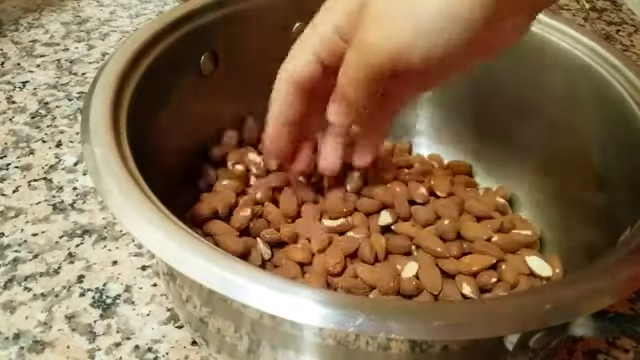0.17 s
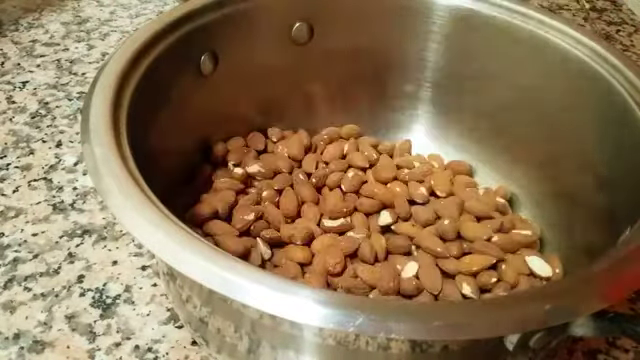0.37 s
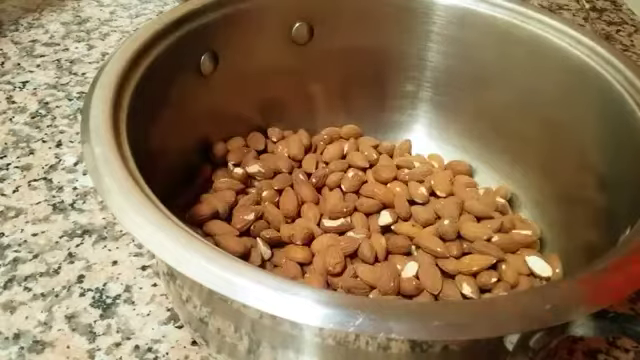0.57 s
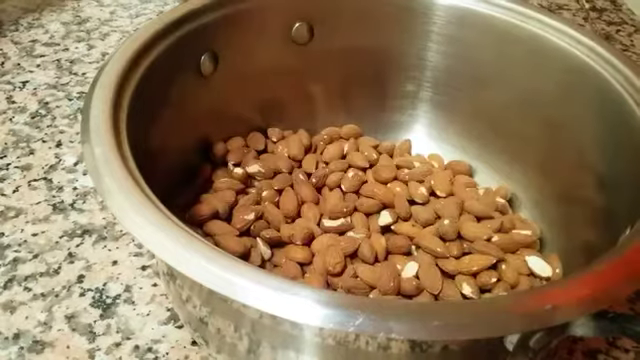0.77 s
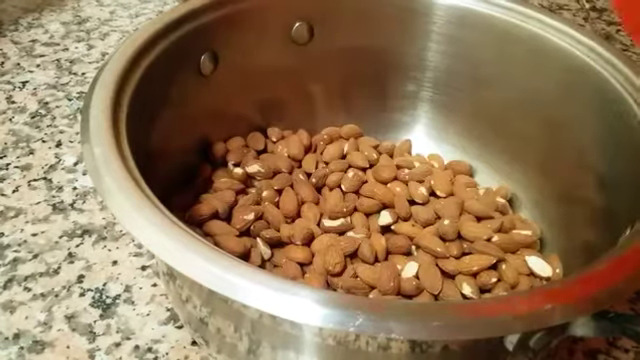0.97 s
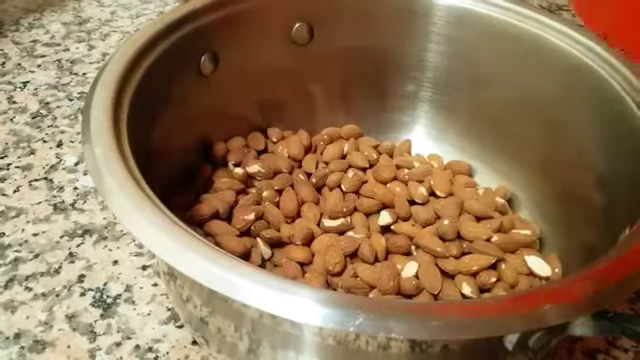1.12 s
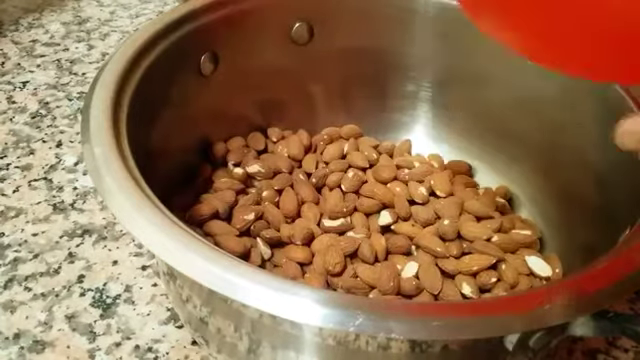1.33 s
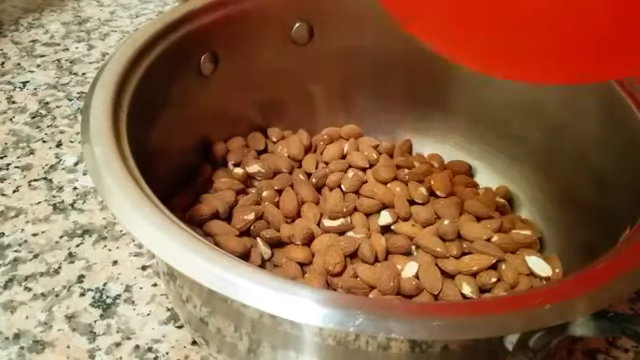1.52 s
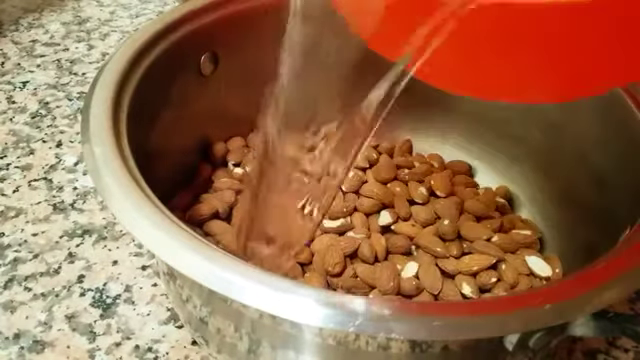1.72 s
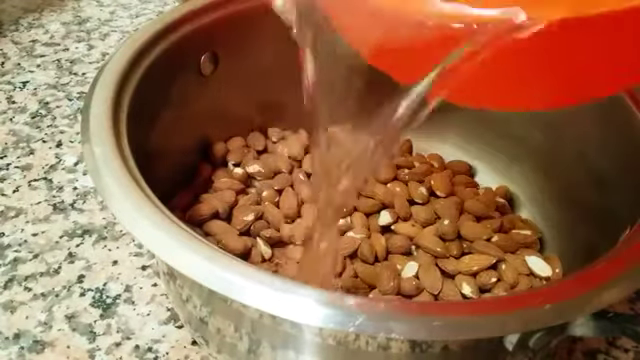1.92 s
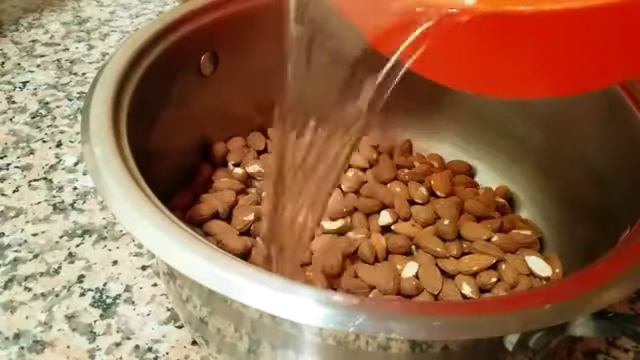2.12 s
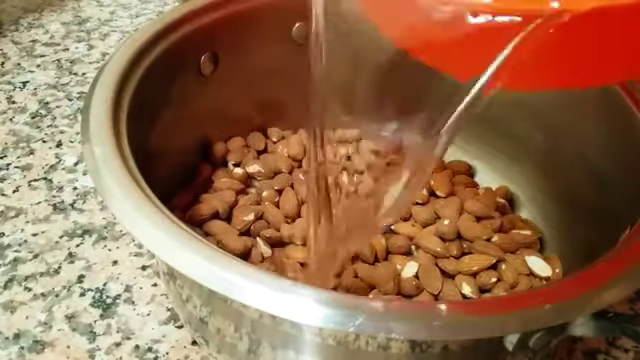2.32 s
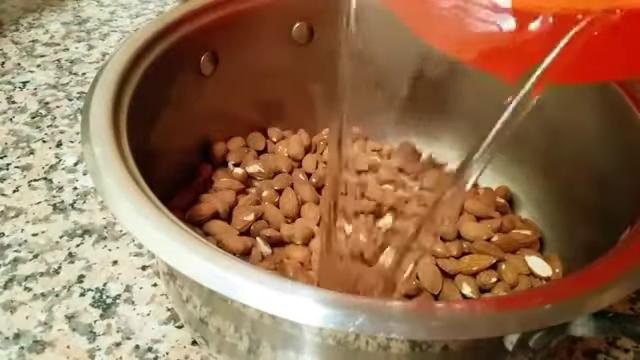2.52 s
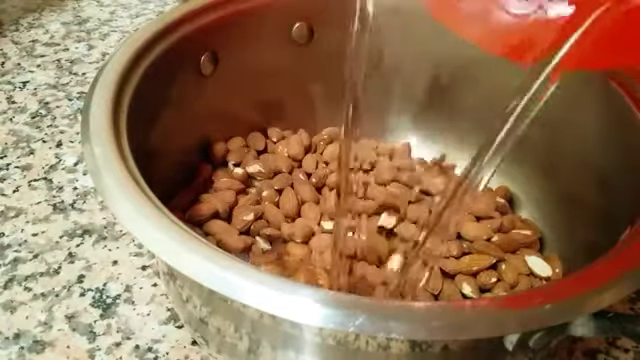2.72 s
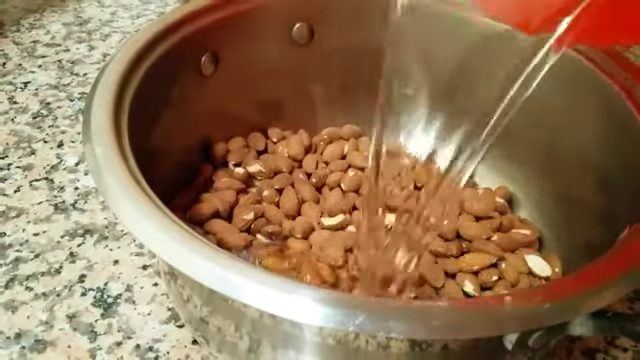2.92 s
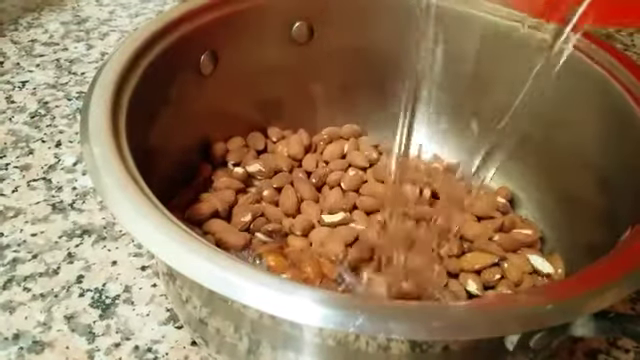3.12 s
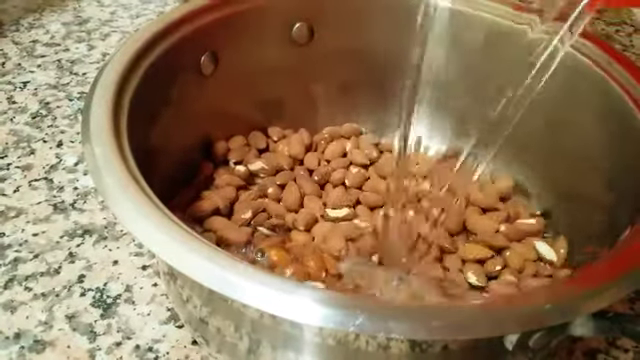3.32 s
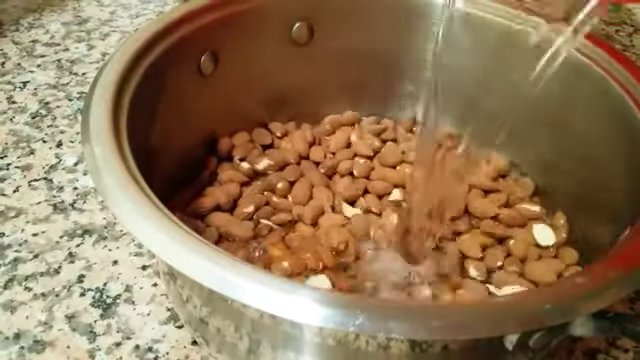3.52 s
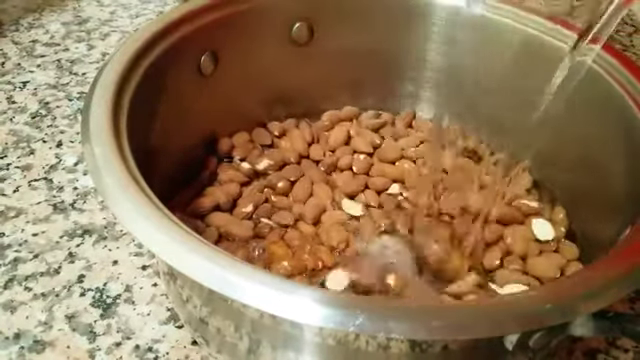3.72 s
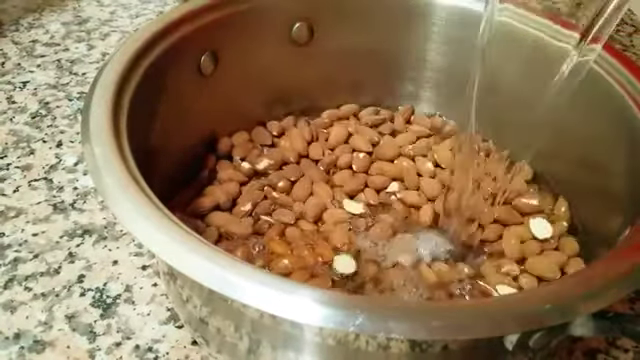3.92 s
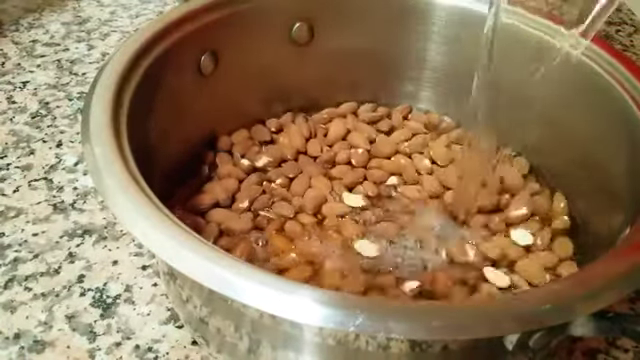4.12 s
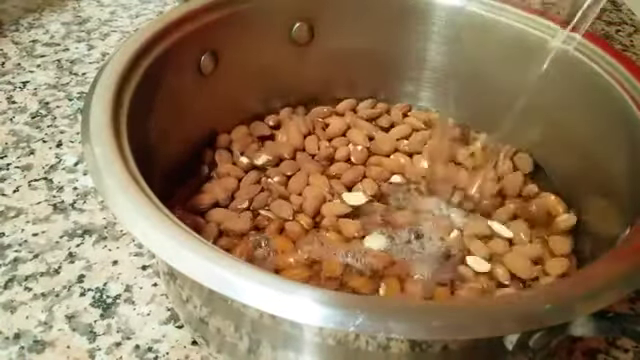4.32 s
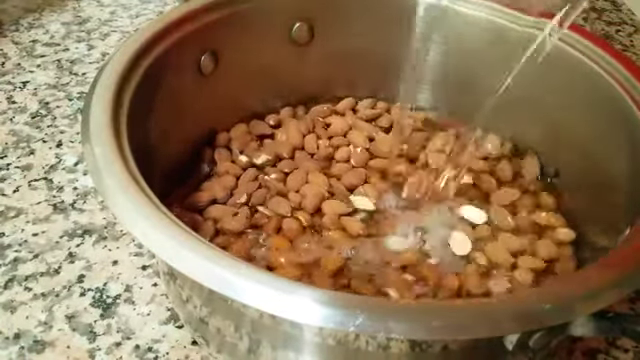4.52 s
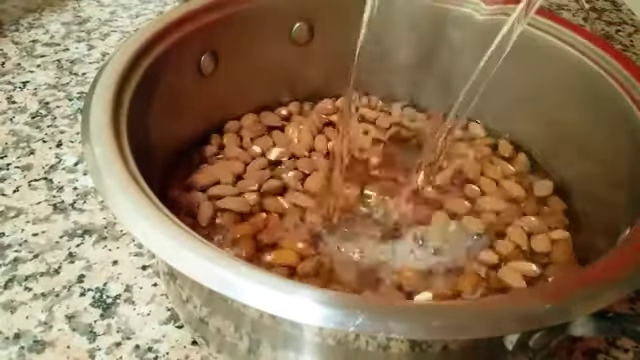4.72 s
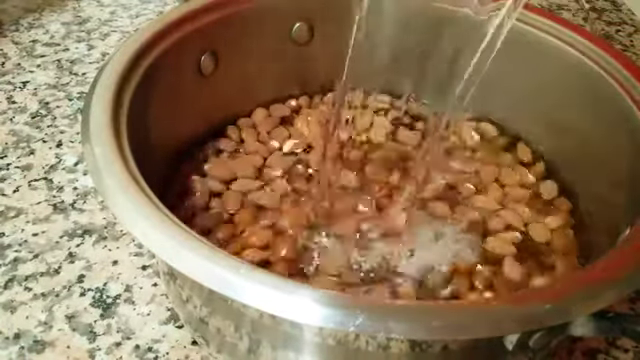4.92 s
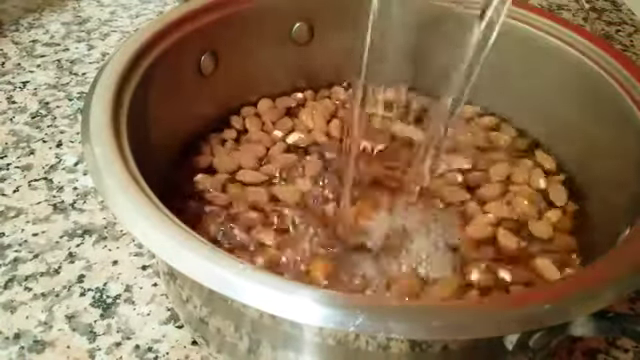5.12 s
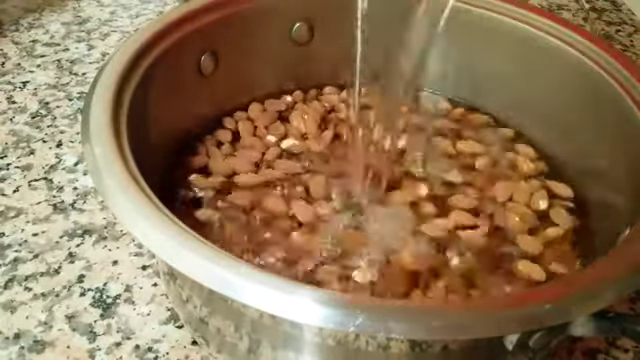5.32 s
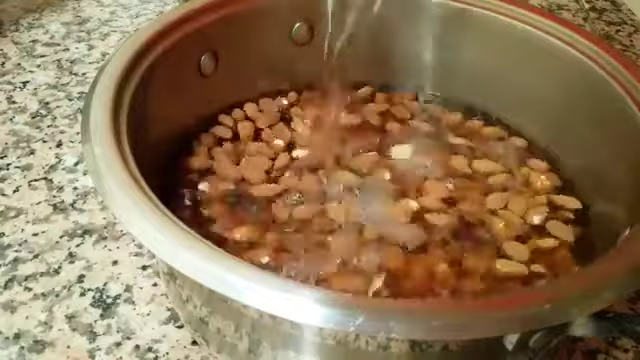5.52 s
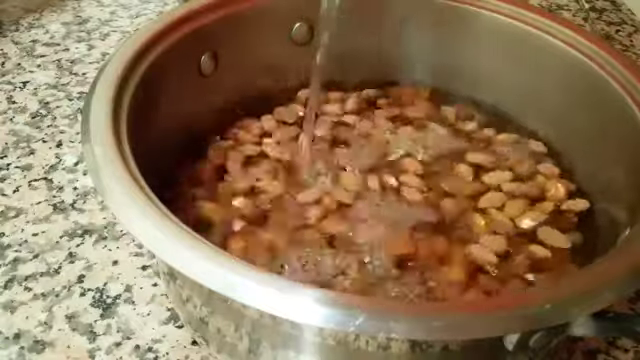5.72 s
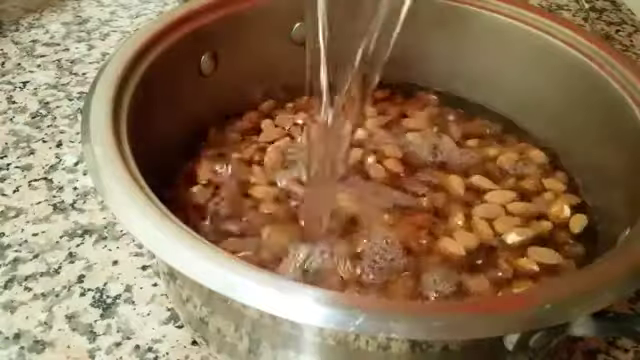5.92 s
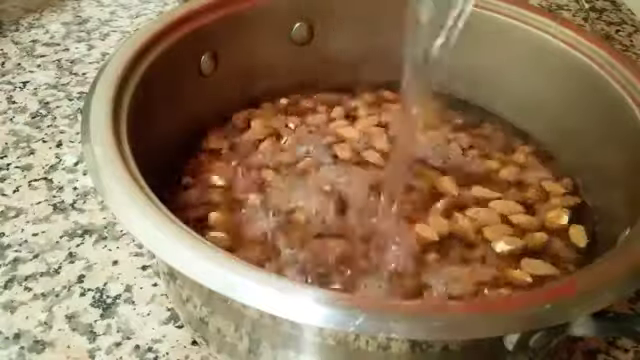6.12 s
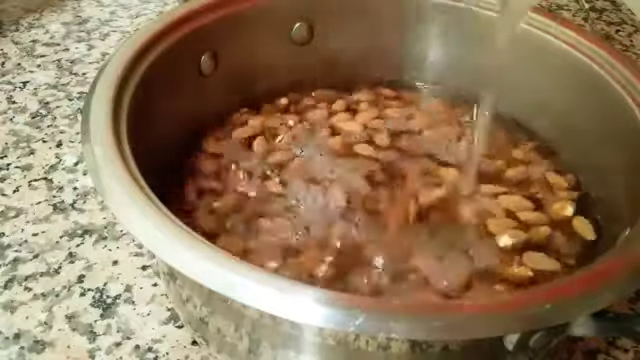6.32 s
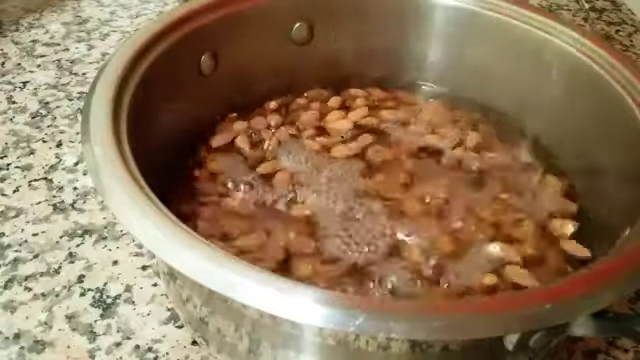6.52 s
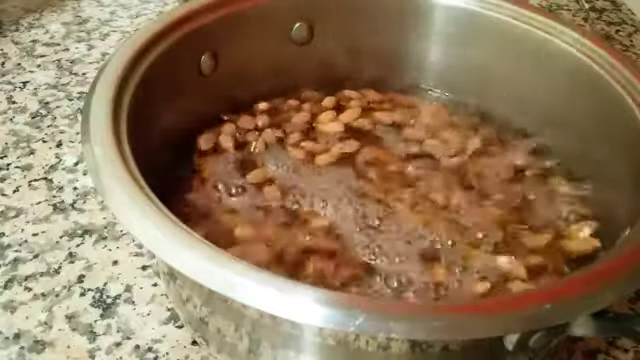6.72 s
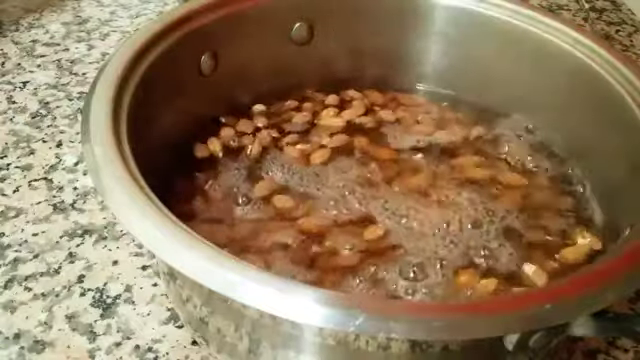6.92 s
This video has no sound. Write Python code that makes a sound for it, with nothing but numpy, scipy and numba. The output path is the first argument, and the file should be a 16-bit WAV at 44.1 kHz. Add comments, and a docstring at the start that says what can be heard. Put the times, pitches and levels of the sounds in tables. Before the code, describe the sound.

Dry almonds rattle briefly in a steel pot, then after a quiet pause water pours in, pattering, drumming and bubbling until it ends in fizz.

```python
"""Over a low kitchen hum, a hand stirs dry almonds in a steel pot: noise grains rub and knocks ring the pot.
Soft rustles, a thin whine and a tap come before water is poured from a jug.
The water patters on the nuts, drums and bubbles as it pools; its bubbles are fading sines that rise in pitch.
Loud drops and heavy slugs stand out, and foam fizzes on the pool.
Late in the pour the sound cuts out for a moment; then the pour ends in drips, fizz and hum."""
import sys
import numpy as np
from scipy import signal
from scipy.fft import rfft, irfft
from scipy.io import wavfile
from scipy.ndimage import uniform_filter1d
from numba import njit

SR = 44100
rng = np.random.default_rng(int(sys.argv[2]) if len(sys.argv) > 2 else 0)


def dump(signal):
    """Clip the signal to [-1, 1] and save it as 16-bit WAV at the path in sys.argv[1]."""
    limited = np.clip(np.atleast_2d(signal).T, -1, 1)
    pcm = np.round(limited * 32767).astype(np.int16)
    wavfile.write(sys.argv[1], SR, pcm)


N = 307104  # length in samples
T = np.arange(N) / SR  # time in seconds
TOP_HZ = 15200  # highest pitch let through
POUR_START_S, POUR_END_S = 1.685, 6.604
POOL_START_S = 2.11  # water starts to gather between the nuts

# how strongly the fingers stir, until they lift out and the nuts settle: t/s, relative level/dB
STIR = [(0, -39.5), (.06, -44.5), (.14, -38), (.21, -40.5), (.25, -52), (.32, -57), (.39, -60), (.46, -79)]
# strength of the stream as the jug tips: t/s, flow/dB
FLOW = [(1.7, 2.5), (1.8, 1), (1.98, -8), (2.04, -1.5), (2.25, -3), (2.4, -11), (2.5, -6.5), (2.63, -2.5),
        (2.69, -9), (2.73, -2), (2.85, 2.5), (3.16, 5), (3.4, 3), (3.6, -1.5), (3.67, -3), (3.8, -1),
        (4.3, .5), (4.7, 5.5), (5.1, 5), (5.45, -2), (5.6, 0.5), (6.12, -1), (6.35, 3), (6.6, -2)]
# shape of the stream: t/s, smoothness (about -1 = broken into drops, 1 = an unbroken column)
SMOOTHNESS = [(2.6, -.1), (3.8, 0), (4.65, -.1), (4.97, .4), (5.2, 1.05), (5.45, 1.15), (5.6, .7),
              (5.77, -.5), (6.6, -.9)]
# single drops and their bubbles: t/s, bubble level/dB, f/Hz,
# relative treble splash level/dB, relative mid spatter level/dB
PLOPS = [(1.689, -27, 1730, -44, -46), (1.718, -19.5, 1640, -35, -21.5), (1.735, -36, 1660, -46, -24),
         (1.862, -32.5, 5530, -41, -42), (1.898, -34, 4530, -33.5, -51), (1.953, -37, 6270, -50, -58),
         (2.024, -38, 1114, -34, -41), (2.063, -37, 1084, -52, -33), (2.092, -33, 3300, -48, -44),
         (2.122, -33.5, 1140, -55, -34), (2.163, -34, 6500, -34.5, -49), (2.21, -38, 1620, -36, -37),
         (2.264, -30, 6130, -38, -49), (2.313, -30, 8550, -45, -49), (2.353, -40.5, 1110, -45, -40),
         (2.514, -32.5, 5510, -41, -47), (2.542, -35.5, 1078, -53, -42), (2.649, -33, 1074, -35, -34),
         (2.711, -28.5, 1085, -40, -33), (2.77, -24, 1670, -52, -26), (2.785, -34, 1670, -34, -29.5),
         (2.879, -24.5, 1060, -31, -24), (2.902, -23, 1510, -52, -18.5), (2.933, -24, 1090, -36.5, -19.5),
         (3.006, -29.5, 5860, -60, -46), (3.051, -26, 1120, -33, -27), (3.074, -25, 1130, -50, -24),
         (3.094, -30, 1180, -40, -27), (3.125, -20.5, 1110, -46, -17.5), (3.16, -28, 1000, -46, -27),
         (3.198, -20.5, 5440, -32.5, -51.5), (3.213, -32, 2740, -52, -15), (3.239, -24, 1137, -53, -23),
         (3.288, -21, 3290, -57, -18.5), (3.308, -19.5, 1116, -48, -31), (3.341, -22, 1086, -50, -16.5),
         (3.379, -34, 1070, -48, -41), (3.446, -24, 1960, -36, -15), (3.532, -31, 1770, -33.5, -20.5),
         (3.629, -34, 655, -42, -25), (3.713, -25, 2460, -35, -41), (3.753, -20, 2560, -39, -30),
         (3.778, -24, 3200, -38, -20), (3.801, -20.5, 1480, -38, -18), (3.84, -21.5, 1100, -41, -25),
         (3.882, -26.5, 4570, -47, -18), (4.04, -25, 1620, -55, -19.5), (4.072, -27.5, 512, -43, -27),
         (4.116, -22.5, 3500, -37, -13.5), (4.259, -29, 872, -41, -24), (4.331, -26, 814, -40, -20.5),
         (4.387, -28, 1930, -43, -27), (4.439, -20, 2880, -28, -15), (4.503, -35, 1700, -30.5, -16),
         (4.55, -29, 900, -33.5, -19), (4.573, -26, 1080, -52, -22.5), (4.613, -20.5, 1200, -38, -19),
         (4.647, -16.5, 865, -31.5, -15), (4.685, -22, 1990, -23.5, -12), (4.746, -18, 2200, -50, -20),
         (4.772, -20, 2710, -41, -25), (4.814, -24, 1110, -45, -29), (4.856, -24, 1100, -54, -20),
         (4.922, -23, 1110, -56, -18), (4.974, -34, 8500, -49, -40), (4.992, -28, 830, -56, -20),
         (5.093, -22, 3200, -53, -39), (5.119, -21, 1710, -40, -26), (5.353, -25, 2210, -53, -39),
         (5.483, -45, 11600, -49, -40), (5.494, -35.5, 8700, -50, -43.5), (5.503, -30, 1160, -33, -15.5),
         (5.571, -24, 1105, -35, -19), (5.588, -25, 1950, -34, -34), (5.76, -25.5, 1680, -34.5, -16.5),
         (5.804, -28, 1470, -39, -31), (5.819, -25, 1700, -47, -27), (5.838, -34, 1180, -32, -32),
         (5.855, -29, 1160, -29, -43), (5.905, -24, 4290, -33, -21.5), (5.958, -20, 4100, -33, -18),
         (5.985, -18, 3930, -34, -22), (6, -25, 2540, -39, -15.5), (6.109, -28.5, 800, -62, -26),
         (6.124, -36, 840, -40, -34), (6.209, -40, 1055, -37, -49), (6.289, -25, 2960, -26, -21),
         (6.309, -22, 3580, -43, -15.5), (6.321, -26, 1140, -49, -27), (6.332, -24, 1295, -42, -28),
         (6.372, -26, 1600, -31.5, -13.5), (6.421, -23.5, 794, -38.5, -37),
         (6.426, -16.5, 3440, -36, -22.5), (6.461, -23, 1710, -49, -22), (6.481, -22.5, 4520, -27, -36),
         (6.535, -27, 2410, -47, -28), (6.548, -43, 5700, -33, -34), (6.577, -31, 1680, -33, -37),
         (6.605, -26.5, 1680, -32.5, -21), (6.642, -26.5, 3610, -34, -24)]
# heavy slugs of water that punch into the pool: t/s, peak level/dB, lowest f/Hz, highest f/Hz, 60 dB decay/s
SLUGS = [(3.813, -30, 460, 770, 0.03), (4.161, -26.5, 414, 1290, 0.027), (4.205, -28, 445, 1290, 0.022),
         (4.6455, -18, 770, 1500, 0.02), (4.647, -18.5, 2650, 4400, 0.019), (4.688, -20.5, 3010, 4160, .02),
         (4.751, -24.5, 1900, 2620, .04), (4.973, -31.5, 398, 810, 0.038), (6.372, -28, 1090, 2460, 0.0091)]


def undb(db):
    """Turn decibels into a gain."""
    return 10 ** (np.asarray(db) / 20)


def unit(x):
    """Scale a signal to an rms (average strength) of 1."""
    return x / np.sqrt(np.mean(x ** 2))


def control(table, column=1):
    """Join the points of a table into a smooth-running control curve over time."""
    rows = np.array(table)
    return np.interp(T, rows[:, 0], rows[:, column])


def curve(table, column):
    """Gain over time from one dB column, practically silent outside its span."""
    rows = np.array(table)
    return undb(np.interp(T, rows[:, 0], rows[:, column], left=-140, right=-140))


def swells(table):
    """Bell-shaped rises; rows hold middle and half-length in s, then dB columns that give one curve each."""
    rows = np.array(table)
    bells = np.exp(-((T - rows[:, :1]) / rows[:, 1:2]) ** 2)
    return rows[:, 2:].T @ bells


def ramp(start, length):
    """Rise steadily from 0 to 1."""
    return np.clip((T - start) / length, 0, 1)


def fade(t, t60):
    """Die away smoothly, by 60 dB in t60 seconds."""
    return np.exp(-np.log(1000) * t / t60)


def add(out, s, x):
    """Mix a short sound in at time s."""
    i = max(int(s * SR), 0)
    out[i:i + len(x)] += x[:max(N - i, 0)]


def convolve(x, response):
    """Let every sample of a sound set off the same response."""
    return signal.fftconvolve(x, response)[:N]


def band(x, lo_hz, hi_hz):
    """Keep only the pitches between two limits."""
    limits = [lo_hz, min(hi_hz, SR / 2 - 100)]
    return signal.sosfilt(signal.butter(2, limits, "band", fs=SR, output="sos"), x)


def colour(x, points, size=4096):
    """Shape the tone to a (Hz, dB) outline with a filter that never sounds before its input."""
    hz, db = np.transpose(points)
    bins_hz = np.arange(size // 2 + 1) * SR / size
    outline_db = np.interp(np.log(bins_hz + 1), np.log(hz), db)
    # folding the cepstrum (spectrum of the log spectrum) packs the response towards its start
    cepstrum = irfft(np.log(undb(outline_db)))
    cepstrum[1:size // 2] *= 2
    cepstrum[size // 2 + 1:] = 0
    return convolve(x, irfft(np.exp(rfft(cepstrum))))


def even(x, span):
    """Hold the mean power near 1 over about span seconds, keeping the fine grain."""
    size = int(span * SR)
    power = uniform_filter1d(uniform_filter1d(x ** 2, size), size)
    return x / np.sqrt(power + 1e-12)


def sizes(chance, spread_db):
    """Many small grains and a few big ones; a negative spread gives many big and a few small."""
    return undb(-spread_db * np.log(np.maximum(chance, .008)))


def clicks(rate, spread_db):
    """One-sample impacts at random moments, rate of them per second on average."""
    when, size, sign = rng.random((3, N))
    return (when < rate / SR) * sizes(size, spread_db) * np.sign(sign - .5)


def moments(chance):
    """Random times that crowd together where the stream is smooth."""
    rate_octaves = .8  # doublings of the bubble rate per unit of smoothness
    weight = np.cumsum(2 ** (rate_octaves * control(SMOOTHNESS)))
    return np.interp(chance, weight / weight[-1], T)


@njit
def ring(starts, hz, cycles, size, rise):
    """Each bubble is a damped sine whose pitch rises as it nears the surface."""
    out = np.zeros(N)
    for k in range(len(starts)):
        first = int(starts[k] * SR)
        length = cycles[k] * SR / hz[k]
        phase = 0.
        for i in range(min(int(length), N - first)):
            phase += 2 * np.pi * hz[k] / SR * (1 + rise * i / length)
            out[first + i] += size[k] * np.exp(-6.9 * i / length) * np.sin(phase)
    return out


def cloud(when, hz, size, cycles, rise):
    """Bubbles of random damping; each returns from the pot wall with a delay set by its place."""
    damping, place, sign = rng.random((len(when), 3)).T
    length = cycles * 2 ** (2 * damping - 1)
    size = size * np.sign(sign - .5)
    direct = ring(when, hz, length, size, float(rise))
    wall_delay = .0004 + .0024 * place
    return direct + 0.73 * ring(when + wall_delay, hz, length, size, float(rise))


def bubbles(lo_hz, hi_hz, cycles, spread_db, rise, count):
    """Bubbles of every pitch in a range, with equal power per Hz."""
    when, radius, size = rng.random((count, 3)).T
    hz = lo_hz + (min(hi_hz, TOP_HZ) - lo_hz) * radius
    # higher bubbles are shorter, so they start louder
    return cloud(moments(when), hz, sizes(size, spread_db) * np.sqrt(hz), cycles, rise)


def pockets(centre_hz, octaves, cycles, spread_db, rise, count):
    """Air pockets whose pitches scatter round a centre that may move."""
    when, size = rng.random((count, 2)).T
    when = moments(when)
    centre = np.interp(when, T, np.broadcast_to(centre_hz, N))
    scatter = np.interp(when, T, np.broadcast_to(octaves, N))
    hz = centre * 2 ** (scatter * rng.standard_normal(count))
    return cloud(when, hz, sizes(size, spread_db), cycles, rise)


def burst(t60, lo_hz, hi_hz):
    """A short crack of fading noise with peak 1."""
    t = T[:SR // 8]
    x = band(rng.standard_normal(len(t)) * fade(t, t60), lo_hz, hi_hz)
    return x / np.abs(x).max()


def spatter(lo_hz, hi_hz, t60, smear, count):
    """A handful of damped sines, like droplets, that start within smear seconds; peak 1."""
    t = T[:SR // 16]
    late, radius, sign = rng.random((3, count, 1))
    age = np.maximum(t - smear * late ** 2, 0)
    hz = lo_hz + (hi_hz - lo_hz) * radius
    drops = np.sin(2 * np.pi * hz * age) * fade(age, t60)
    mixed = np.sum(drops * (1 - late / 2) * np.sign(sign - .5), axis=0)  # late drops are weaker
    x = band(mixed, 1.19 * lo_hz, 2.0 * hi_hz)
    return x / np.abs(x).max()


def kitchen():
    """Low room rumble, made of shaped noise, with the wavering hum of an appliance."""
    # tone of the room: f/Hz, relative level/dB
    room_colour = [(25, -23.5), (40, -13), (60, -6), (100, -4.5), (150, -15.5), (220, -15), (400, -25),
                   (700, -27.5), (1300, -26), (2000, -33.5), (4500, -33.5), (6000, -40), (8500, -37.5),
                   (10000, -43.5), (15000, -45.5)]
    # steady hum and a thin electric whine: f/Hz, rms level/dB
    hum_tones = [(65, -75), (118.4, -73.5), (132, -74), (10497, -99), (14390, -87)]
    air = unit(colour(rng.standard_normal(N), room_colour)) * undb(-68)
    waver = np.cumsum(rng.standard_normal((len(hum_tones), N)), axis=1) * .012  # phase drift in radians
    hum = sum(np.sqrt(2) * undb(db) * np.sin(2 * np.pi * hz * T + w) for (hz, db), w in zip(hum_tones, waver))
    return air + hum


def steel(x, modes):
    """Each (Hz, dB, t60) mode of the pot rings on; at 0 dB it answers as loudly as it is driven."""
    t = T[:SR // 2]
    decay = 2 * np.log(1000) / SR
    response = sum(undb(db) * decay / t60 * fade(t, t60) * np.cos(2 * np.pi * hz * t) for hz, db, t60 in modes)
    return convolve(x, response)


def almonds():
    """Nuts rub and click under the fingers; every knock also rings the pot."""
    # almonds that knock on each other and on the pot: t/s, peak level/dB, treble peak level/dB, treble decay/s
    knock_table = [(0.019, -37, -52, 0.034), (0.036, -42, -45, .02), (.061, -39.5, -35.5, 0.011),
                   (.07, -25.5, -37, 0.052), (0.084, -31, -42.5, 0.0084), (0.1, -28, -31.5, 0.037),
                   (0.124, -31, -36.5, 0.027), (0.133, -25, -29, 0.053), (0.155, -27, -27, 0.038),
                   (0.172, -49, -37, 0.013), (.183, -20.5, -19.5, 0.018), (0.19, -23.5, -23, 0.076),
                   (0.272, -35, -58, .018), (0.293, -50, -60, .012), (0.341, -49, -64, 0.018),
                   (0.369, -51, -58, 0.014), (0.388, -53, -70, 0.01)]
    # tone of the rubbing nuts: f/Hz, relative level/dB
    nut_colour = [(150, -20.5), (290, 8), (400, -15.5), (490, 7), (620, -4.5), (800, -5.5), (1050, 4),
                  (1450, -5.5), (2000, -6.5), (2250, 0.5), (4500, -1), (8500, -7), (10200, -17.5),
                  (15000, -10)]
    # ringing of the steel pot: f/Hz, relative level/dB, 60 dB decay/s
    pot_modes = [(330, -6, 0.73), (425, -4, .3), (1037, -2, 0.28), (1129, 8, 0.28), (1630, 3.5, 0.24),
                 (2190, 10, .18), (2630, 0, .19), (2770, 3, 0.13), (3370, -14, .3), (4240, 2, 0.18),
                 (4590, 2, 0.45), (4760, 4, 0.26), (5900, -4, 0.3), (5670, -5, 0.42), (7400, -22, .3)]
    thud_db, thud_growth = -26.5, 0.4  # thud under a full-scale knock; dB of thud per dB of knock
    rattle = colour(bubbles(220, 10100, cycles=1.3, spread_db=4.5, rise=0, count=20000), nut_colour)
    out = even(rattle, 0.098) * curve(STIR, column=1) * undb(-3.0)
    for s, peak_db, treble_db, t60 in knock_table:
        add(out, s, undb(peak_db) * spatter(2200, 7000, t60=t60, smear=0.001126, count=40))
        add(out, s, undb(thud_db + thud_growth * peak_db) * burst(0.047, 325, 1320))
        add(out, s, undb(treble_db) * burst(t60, 5500, 8970))
    return out + undb(0.5) * steel(out, pot_modes)


def pouring():
    """Gain of the pour: it lands abruptly, holds, and dies away once the jug is lifted."""
    onset_db_per_s, release_db_per_s = 1010, 161
    onset_db = onset_db_per_s * np.minimum(T - POUR_START_S, 0)
    release_db = release_db_per_s * np.maximum(T - POUR_END_S, 0)
    return undb(onset_db - release_db)


def thrum():
    """The loaded pot rocks on its base under small blows, heard as a narrow low band of clicks."""
    # the thrum swells now and then: middle t/s, half-length/s, extra level/dB
    thrum_swells = [(3.55, 0.11, 12.5), (5.85, 0.38, 9.5)]
    start_db, load_db_per_s = -77, 2.2  # base level as the pour starts, and its growth with the load
    flow_growth = .5  # dB of thrum per dB of flow
    stir_db = -19.5  # thrum compared with the stirring curve
    load_db = start_db + load_db_per_s * (T - POUR_START_S)
    water = pouring() * undb(load_db + flow_growth * control(FLOW) + swells(thrum_swells)[0])
    rocking = unit(band(clicks(rate=440, spread_db=-2.0), 121, 143.6))
    return rocking * (water + undb(stir_db) * curve(STIR, column=1))


def echoes(x, t60, lo_hz, hi_hz, delay):
    """Blurred reflections: a tail of fading noise that starts after a delay in s."""
    t = T[:SR // 2]
    tail = band(rng.standard_normal(len(t)) * fade(t, t60) * (t > delay), lo_hz, hi_hz)
    return convolve(x, tail / np.linalg.norm(tail))


def rustles():
    """Soft, grainy brushing sounds of handling, cut from random clicks."""
    # faint rustles while the jug is fetched: middle t/s, half-length/s, level/dB, lowest f/Hz, highest f/Hz
    rustle_table = [(.5, .09, -82, 4250, 5500), (0.853, .06, -79.5, 7000, 9000),
                    (.86, .045, -78, 900, 1050), (.935, 0.046, -73, 2960, 4200),
                    (1.075, .035, -83.5, 7800, 9100)]
    grain = clicks(rate=3700, spread_db=5.0)
    out = np.zeros(N)
    for s, half, db, lo_hz, hi_hz in rustle_table:
        swell = np.exp(-((T - s) / half) ** 2)
        out += undb(db) * swell * unit(band(grain, lo_hz, hi_hz))
    return out


def whine():
    """A faint, thin, wavering sine swells up and is strongest shortly before the pour."""
    # one tone: f/Hz, rms level at its height/dB, middle t/s, half-length/s
    hz, db, s, half = (1355, -83, 1.5, 0.5)
    waver = np.cumsum(rng.standard_normal(N)) * .02  # phase drift in radians
    swell = np.exp(-((T - s) / half) ** 2)
    return np.sqrt(2) * undb(db) * swell * np.sin(2 * np.pi * hz * T + waver)


def tap():
    """A light, dry tap, a short noise burst, as the jug is brought to the pot."""
    tap_s, tap_db = 1.062, -58
    out = np.zeros(N)
    add(out, tap_s, undb(tap_db) * burst(0.034, 1900, 3500))
    return out


def patter():
    """Drops knock on the bare almonds with short, dull ticks."""
    # patter on the bare nuts, until the pool covers them: t/s, level/dB
    patter_levels = [(1.67, -74), (1.71, -56), (1.79, -63), (1.87, -75), (2.015, -70), (2.03, -51),
                     (2.14, -55.5), (2.26, -63), (2.42, -70), (2.7, -56), (3, -62)]
    # tone of the patter: f/Hz, relative level/dB
    patter_colour = [(200, -3), (330, -5.5), (520, 5), (720, -11), (1100, 0.5), (1600, -2), (2600, -5.5),
                     (4200, 2.5), (7000, -15)]
    ticks = colour(bubbles(280, 7200, cycles=3.3, spread_db=4.0, rise=0, count=9000), patter_colour)
    return even(ticks, 0.068) * curve(patter_levels, column=1)


def lumps():
    """Blobs of water land abruptly and drain away, in dB; a smooth column has weaker lumps."""
    lump_db, lump_t60_s = 2.5, 0.065  # swing of a broken stream; decay of the blobs' power
    smoothing = 0.53  # share of the swing that a smooth column loses
    blobs = np.abs(clicks(rate=85, spread_db=5.0))
    swell = convolve(blobs, fade(T[:SR // 4], lump_t60_s))
    swell = uniform_filter1d(np.sqrt(np.abs(swell)), size=24)
    strength = 1 - smoothing * np.clip(control(SMOOTHNESS), 0, 1)
    return lump_db * unit(swell - swell.mean()) * strength


def necking():
    """The stream thins just before each big drop: a brief dip, in dB."""
    neck_db, lead_s, half_s = -1, 0.0096, 0.0067  # depth, time ahead of the drop, half-length
    return swells([(s - lead_s, half_s, neck_db) for s, *_ in PLOPS + SLUGS])[0]


def drive(layer, gush_db):
    """Gain of one layer from the flow, the pool and the shape of the stream."""
    db, growth, dry_db, wetting_s, smooth_db = layer
    dry = 1 - ramp(POOL_START_S, wetting_s)
    flow_db = growth * (control(FLOW) + gush_db)
    return pouring() * undb(db + flow_db + dry_db * dry + smooth_db * control(SMOOTHNESS))


def stream():
    """Spray ticks on the nuts, trapped air rings as bubbles, and the falling water drums in the pool."""
    # four layers of the pour, each: base level in the pool/dB, growth/dB per dB of flow,
    # extra level on dry nuts/dB, time the pool takes to remove that/s, change/dB per unit of smoothness
    spray_layer = (-56, 0.4758, 6, 1.8, -3.5)
    small_layer = (-41.5, 1, -9, 1.98, 2)
    drum_layer = (-42.5, 0.72, -17.5, 0.64, 1)
    gulp_layer = (-49.5, 1.05, -13, 1.6, -7.5)
    # tone of the spray: f/Hz, relative level/dB
    spray_colour = [(1500, -26), (4000, -3), (5500, 4.5), (6500, -2.5), (7500, -2), (8900, 4), (10000, -10),
                    (12500, -8), (15000, -8.5)]
    # tone of the small bubbles: f/Hz, relative level/dB
    bubble_colour = [(1100, -4.5), (1600, 2), (2100, 2.5), (2500, -2), (2750, 1), (3100, -1), (4000, -2.5),
                     (5500, -12.5), (7000, -22)]
    # pitch of the drumming as the stream wanders over nuts and pool: t/s, centre f/Hz, spread/octaves
    drum_pitch = [(1.9, 1050, 0.091), (2.5, 1099, 0.21), (2.82, 1340, 0.35), (2.96, 1263, 0.34),
                  (3.08, 1143, 0.22), (3.35, 1092, 0.191), (3.6, 1184, 0.353), (4.1, 1202, 0.29),
                  (4.7, 1063, 0.23), (6.4, 1067, 0.35)]
    # gushes, when the jug tips further: middle t/s, half-length/s, extra splashing/dB, extra gulping/dB
    gush_table = [(1.73, 0.016, 7, 4), (2.796, 0.013, 12.5, -21), (3.16, 0.053, 6, 0),
                  (3.72, 0.04, 7.5, -10), (3.836, 0.075, 7, 7), (4.091, 0.038, 4.5, 9.5),
                  (4.417, 0.12, 3.5, -12.5), (4.705, 0.088, 7.5, 5), (5.59, 0.037, 4.5, -7),
                  (5.996, 0.09, 5, 2), (6.276, 0.11, 1, -7.5)]
    # spread of the gulps: base/octaves, growth/octaves per dB of flow, change/octaves per unit of smoothness
    base_octaves, flow_octaves, smooth_octaves = (0.08, 0.043, -0.21)
    dry_hz, pool_hz = 530, 628  # gulp pitch on the nuts and in the pool, at smoothness 0
    pitch_octaves = 0.63  # a smooth column makes smaller, higher pockets: octaves per unit of smoothness
    soaked_s, unsoaked_db = 2.02, -36  # the water reaches the pot's floor; gulps are weaker until then
    slap_db, slap_t60_s = -41, 0.37  # the first gush slaps the dry nuts

    pooled_hz = dry_hz + (pool_hz - dry_hz) * ramp(POOL_START_S, gulp_layer[3])
    gulp_hz = pooled_hz * 2 ** (pitch_octaves * control(SMOOTHNESS))
    gulp_octaves = base_octaves + flow_octaves * control(FLOW) + smooth_octaves * control(SMOOTHNESS)
    gulp_octaves = np.maximum(gulp_octaves, .1)
    splash_db, gulp_db = swells(gush_table)
    lump_db = lumps() + necking()
    soaked = undb(unsoaked_db * (1 - ramp(soaked_s, 0.02)))

    spray = colour(bubbles(1520, 14600, cycles=17.0, spread_db=5.0, rise=0.1, count=34000), spray_colour)
    small = colour(bubbles(1287, 7460, cycles=33, spread_db=5.0, rise=0.06, count=30000), bubble_colour)
    crackle = colour(bubbles(890, 5400, cycles=3.2, spread_db=4.1, rise=0, count=20000), bubble_colour)
    drum = pockets(control(drum_pitch), control(drum_pitch, column=2),
                   cycles=40.7, spread_db=2.5, rise=0.34, count=7000)
    gulps = pockets(gulp_hz, gulp_octaves, cycles=10.0, spread_db=1.0, rise=0.046, count=5000)
    slap = pockets(centre_hz=2270, octaves=0.394, cycles=44, spread_db=7.5, rise=0.029, count=16000)

    fine = undb(-5.5) * even(small, 0.044) + undb(-10.5) * even(crackle, 0.3)
    slap_fade = fade(np.maximum(T - POUR_START_S, 0), slap_t60_s)
    return (even(spray, 0.28) * drive(spray_layer, splash_db + lump_db)
            + fine * drive(small_layer, splash_db + lump_db)
            + undb(-2.5) * even(drum, 0.044) * drive(drum_layer, 0.49 * splash_db + lump_db)
            + undb(-3.0) * even(gulps, 0.2) * soaked * drive(gulp_layer, gulp_db + 0.54 * lump_db)
            + undb(slap_db) * even(slap, 0.067) * pouring() * slap_fade)


def plops(cycles=21, rise=0.071):
    """A drop lands with a spatter and leaves one loud bubble, which swells over a few cycles."""
    out = np.zeros(N)
    t = T[:SR // 10]
    for s, peak_db, hz, treble_db, mid_db in PLOPS:
        life = cycles / hz + 0.01
        tone = np.sin(2 * np.pi * hz * t * (1 + rise * t / life / 2))
        bubble = tone * fade(t, life) * (1 - np.exp(-t * hz / 2.74))
        add(out, s + 0.00096, undb(peak_db) * bubble)
        add(out, s, undb(treble_db + 1.0) * burst(0.032, 2900, 8300))
        # a smaller bubble comes with finer spatter
        fine = spatter(380 + 0.17 * hz, 2100 + 0.954 * hz, t60=0.0091, smear=0.0045, count=16)
        add(out, s, undb(mid_db - 9.0) * fine)
    return out


def wet_steel(water):
    """As the stream wanders and the pot fills, one ringing mode after another answers most."""
    # pot ringing under the pour: f/Hz, relative level/dB, 60 dB decay/s, strongest t/s, half-length/s
    wet_modes = [(430, 3, 0.45, 6.08, 0.11), (627.4, 7.5, 0.17, 3.8, 0.7), (1092, 2, 0.07, 2.25, 0.39),
                 (2180, 4, 0.09, 2.16, 0.14), (808, 0, 0.15, 5.83, 0.42), (873, -1, 0.18, 4.4, 0.66),
                 (1237, -3, 0.077, 3.5, 1.9), (1663, -6, 0.08, 3, 4.3), (2040, 2.5, 0.058, 4.72, 0.24),
                 (2730, 2.5, 0.074, 3.3, 3.3)]
    out = np.zeros(N)
    for hz, db, t60, s, half in wet_modes:
        answer = np.exp(-((T - s) / half) ** 2)
        out += steel(water * answer, [(hz, db, t60)])
    return out


def foam():
    """Tiny bubbles burst in clusters on the pool and go on fizzing after the pour."""
    # tone of the fizz: f/Hz, relative level/dB
    foam_colour = [(3000, -10.5), (5000, 2.5), (6500, -0.5), (8900, 5.5), (10300, -6.5), (15000, -5.5)]
    foam_db, flicker_db = -67.5, 4  # middle level, and the rms swing of the clusters around it
    fill_s = 2.9  # time the water takes to get deep
    fizz = colour(bubbles(2900, 13000, cycles=7.1, spread_db=3.0, rise=0, count=30000), foam_colour)
    flicker = unit(uniform_filter1d(rng.standard_normal(N), size=2400))
    return undb(foam_db + flicker_db * flicker) * even(fizz, 0.16) * ramp(POOL_START_S, fill_s)


def slugs():
    """A slug of water tears open a cavity that breaks into a cluster of loud bubbles."""
    out = np.zeros(N)
    for s, peak_db, lo_hz, hi_hz, t60 in SLUGS:
        add(out, s, undb(peak_db) * spatter(lo_hz, hi_hz, t60=t60, smear=0.0049, count=14))
    return out


def scene():
    """The pot stands close by; the kitchen walls answer faintly."""
    water = stream() + patter() + plops() + slugs() + foam()
    water = band(water, 244, 24000)  # small sources radiate little bass
    direct = almonds() + water + wet_steel(water) + thrum() + tap() + rustles()
    walls = undb(-14.5) * echoes(direct, 0.29, 150, 9000, 0.0031)
    return (direct + walls + kitchen() + whine())[None]


def record(dry):
    """The sound drops by 57 dB for a moment, and a steep filter cuts the top."""
    # the dropout: start t/s, end t/s
    quiet_start, quiet_end = (5.622, 5.758)
    live = 1. * ((T < quiet_start) | (T > quiet_end))
    live = uniform_filter1d(live, size=64)  # soften the edges
    gated = dry * np.maximum(live, undb(-57.0))
    return signal.sosfilt(signal.ellip(8, .2, 70, TOP_HZ, fs=SR, output="sos"), gated)


dry = scene()
out = record(dry)
dump(out)
```